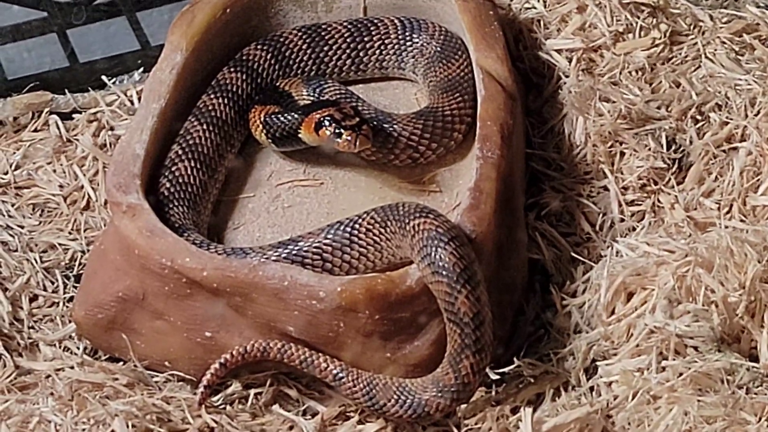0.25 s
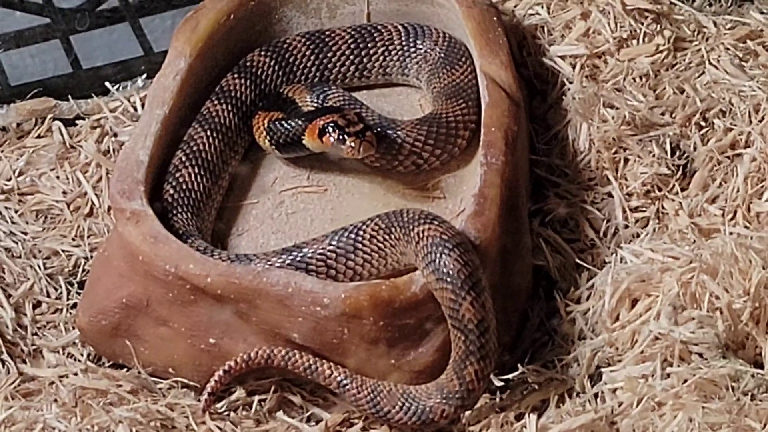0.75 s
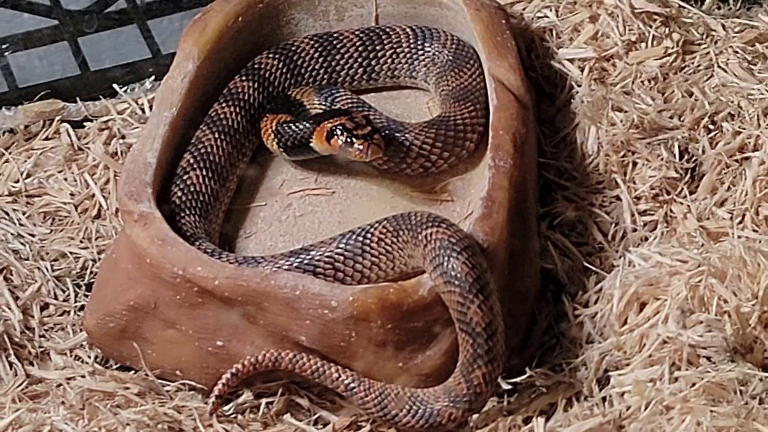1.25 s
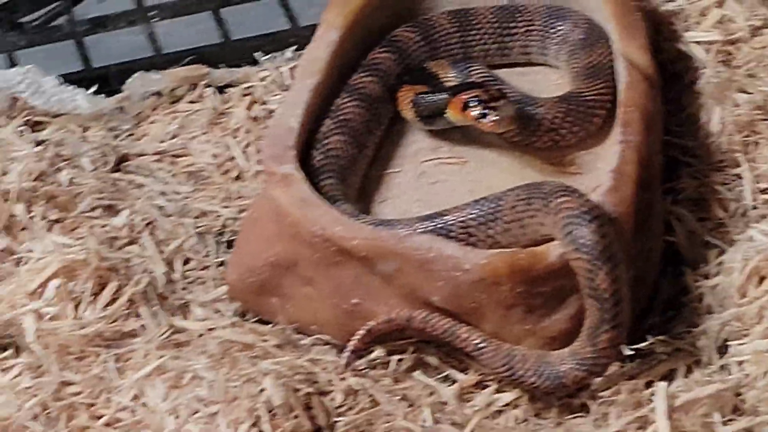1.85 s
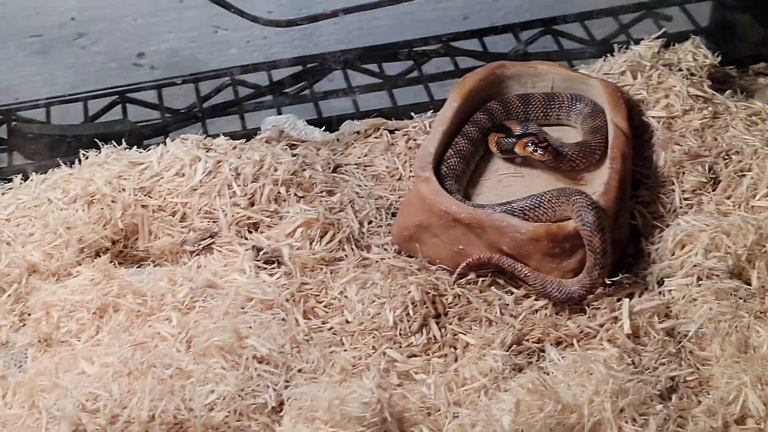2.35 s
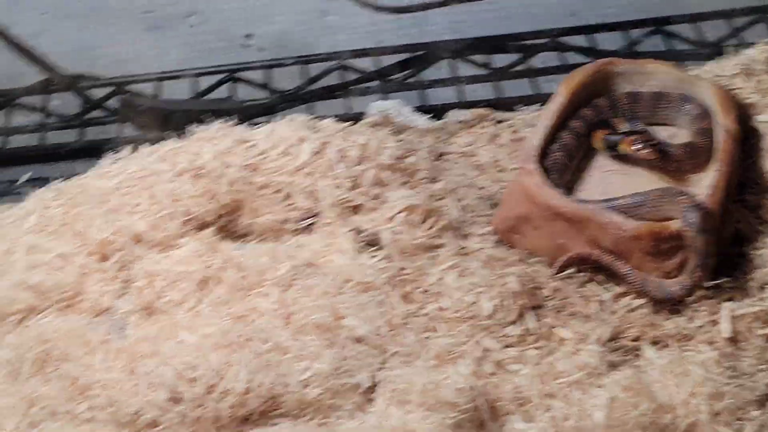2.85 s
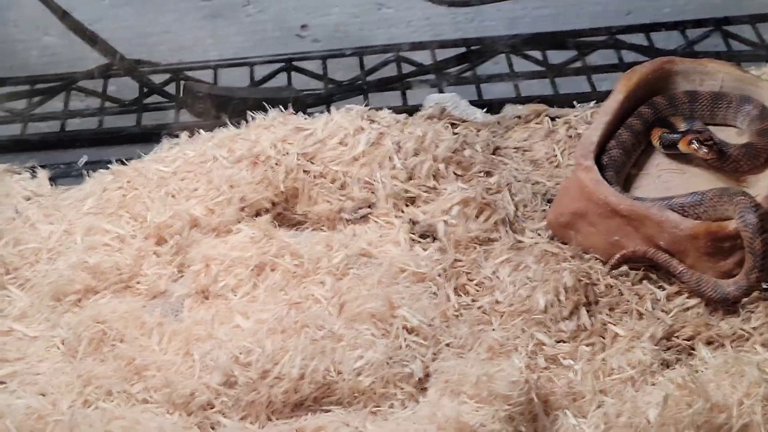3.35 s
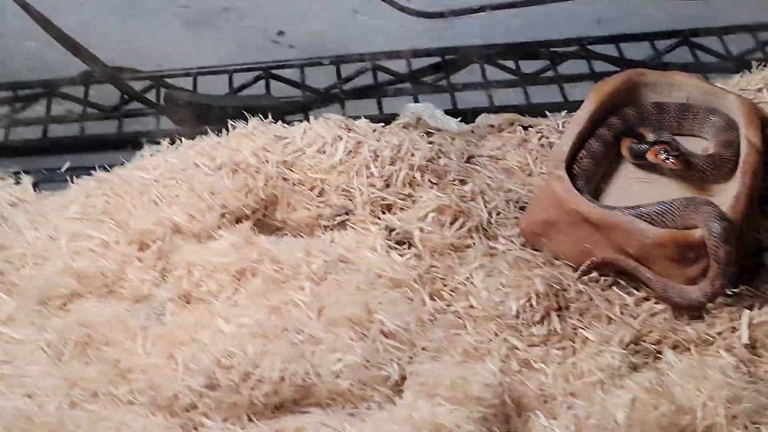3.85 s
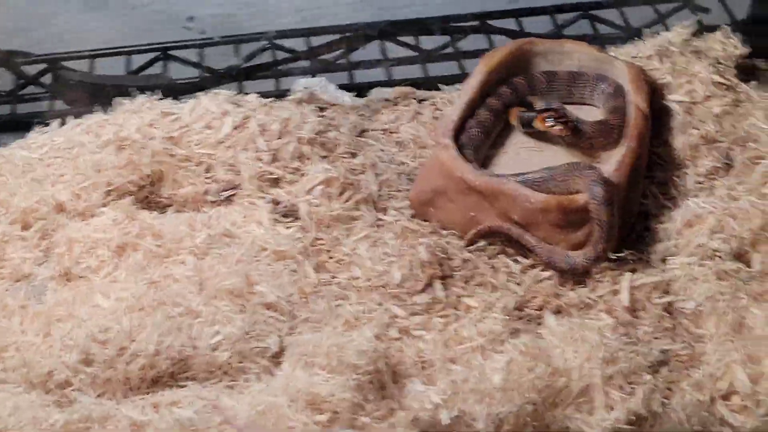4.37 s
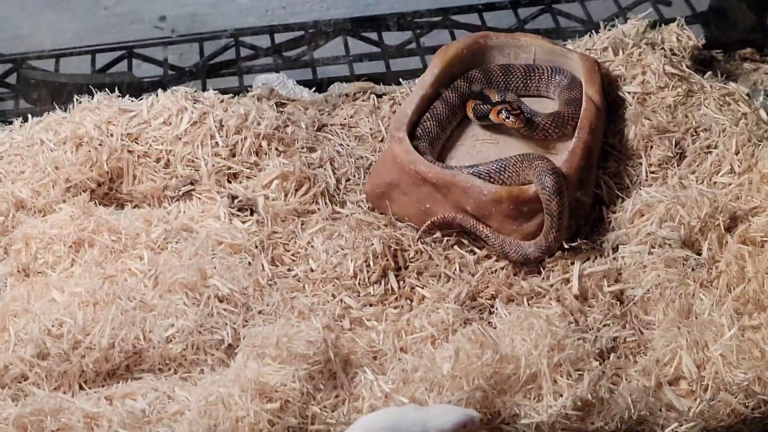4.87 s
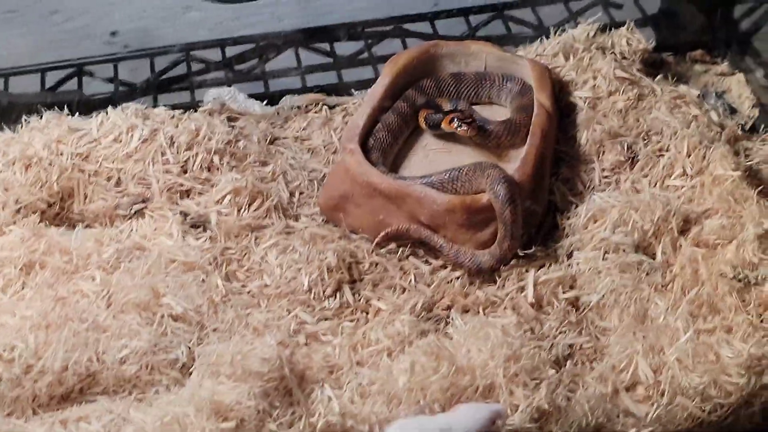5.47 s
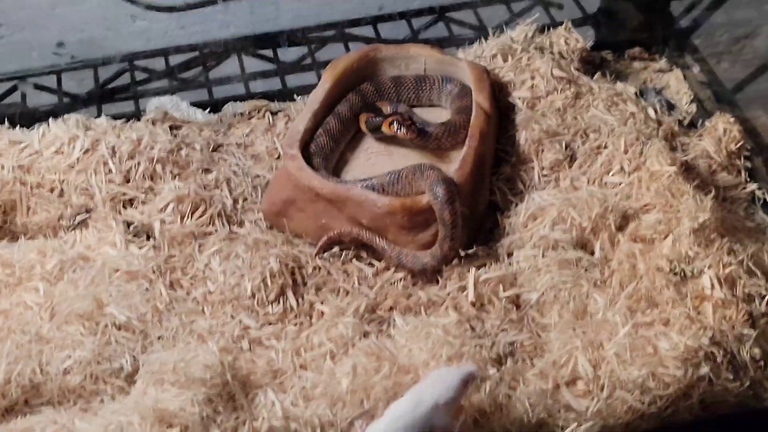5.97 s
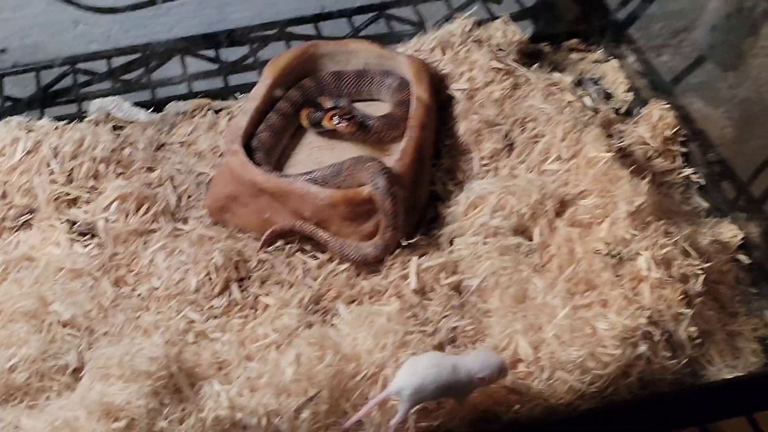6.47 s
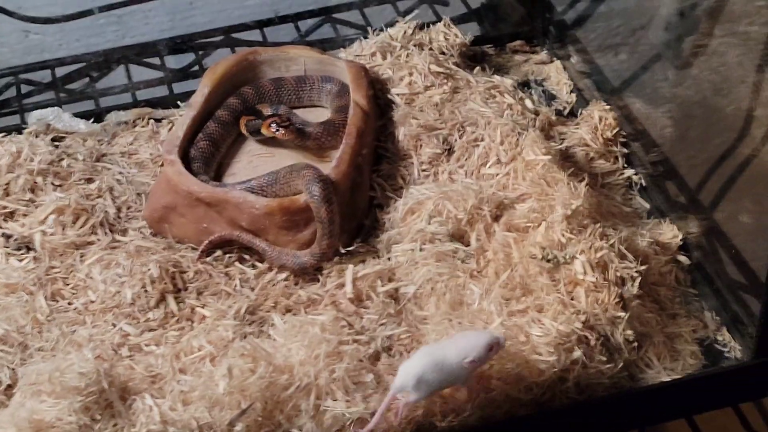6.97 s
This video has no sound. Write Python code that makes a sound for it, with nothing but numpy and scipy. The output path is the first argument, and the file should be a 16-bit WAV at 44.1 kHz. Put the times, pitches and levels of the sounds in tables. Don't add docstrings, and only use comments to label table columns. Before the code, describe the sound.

Continuous fast rattling of hollow tail segments, about twenty strokes a second, with occasional cage taps and handling bumps over faint, fading room rumble.

```python
import sys
import numpy as np
from scipy import signal
from scipy.fft import rfft, irfft, next_fast_len
from scipy.io import wavfile
from scipy.ndimage import uniform_filter1d

SR = 44100
rng = np.random.default_rng(int(sys.argv[2]) if len(sys.argv) > 2 else 0)


def file_out(sig):
    cols = np.atleast_2d(sig).T
    lim = np.clip(cols, -1, 1)
    pcm = np.round(lim * 32767).astype(np.int16)
    wavfile.write(sys.argv[1], SR, pcm)


def field_ratio(decibels):
    return 10 ** (np.asarray(decibels, dtype=float) / 20)


N = 318402
SIZE = next_fast_len(N + SR // 2)
BINS = np.arange(SIZE // 2 + 1) * SR / SIZE + 1

# (time [s], level [dB], swell [ms])
TAIL_SHAKING = [(.018, -35, 58), (.134, -34, 32.5), (.990, -33.5, 32), (1.867, -33, 28), (1.957, -34.5, 17),
                (2.069, -34, 24), (2.378, -36, 20), (2.516, -33.5, 15), (3.307, -34, 15.6),
                (4.078, -32.5, 18), (4.319, -34, 14), (4.920, -34.5, 27.5), (5.643, -35.5, 25),
                (5.682, -38, 20), (5.796, -34, 30), (6.860, -32.5, 18.5), (7, -32.5, 18),
                (7.165, -36.5, 43)]
STROKES_DONE = [0, 2, 19, 36, 38, 40, 46, 49, 65, 80, 85, 97, 111, 112, 114, 135, 138, 141]
# (time [s], level over the rest [dB])
ACCENTS = [(.19, 3), (.235, -3), (.38, -2.5), (.43, 2), (1.15, -2.5), (1.20, 1), (1.30, -2.5), (1.41, 1.5),
           (1.555, -4), (1.71, -1.5), (2.12, -4.5), (2.43, 3.5), (2.47, -2), (2.86, -1.5), (2.91, 2),
           (3.11, -5.5), (3.52, -3), (3.66, 0.5), (3.72, -2.5), (3.77, 1), (4.18, 2), (4.27, 3), (4.32, -3),
           (4.42, 3.5), (6.81, 2), (5.07, 2), (5.54, 2.5), (6.505, 1), (6.61, 1.5), (6.66, -2)]


def strokes():
    scatter_db, jitter_s, swell_scatter = 0.91, 0.0013, 0.11
    lead_s, snap_per_db = 0.010, 0.19
    number = np.arange(STROKES_DONE[-1] + 2)
    columns = np.transpose(TAIL_SHAKING)
    s, db, swell_ms = (np.interp(number, STROKES_DONE, column) for column in columns)
    s[-1] += s[-2] - s[-3]
    for at_s, over_db in ACCENTS:
        nearest = np.argmin(np.abs(s - at_s))
        db[nearest] += over_db
        swell_ms[nearest] *= np.exp(-snap_per_db * over_db)
    chance = rng.standard_normal((3, len(number)))
    swell_ms = swell_ms * np.exp(swell_scatter * chance[0])
    s = s - lead_s - 0.00023 * swell_ms + jitter_s * chance[1]
    return zip(np.maximum(s, 0), db + scatter_db * chance[2], swell_ms)


def effort():
    settle_s, loose_db = 0.012, -8
    t = np.arange(N) / SR
    power = np.zeros(N)
    for s, db, swell_ms in strokes():
        start = max(int((s - 0.05) * SR), 0)
        since = t[start:int((s + 0.15) * SR)] - s
        rise = 1 / (1 + np.exp(-since / (0.000066 * swell_ms)))
        fall = np.exp(-np.clip(since - 0.00059 * swell_ms, 0, None) / settle_s)
        power[start:start + len(since)] += field_ratio(2 * db) * rise * fall
    return np.sqrt(power + np.mean(power) * field_ratio(2 * loose_db))


def ticks():
    ticks_per_s, scatter_db = 1600, 2.5
    chance = rng.random((3, N))
    over = np.minimum(-np.log(1 - chance[1]), 3.5)
    size = field_ratio(scatter_db * over) * np.sign(chance[2] - 0.5)
    return unit((chance[0] < ticks_per_s / SR) * size)


def joints(force, count):
    shares = field_ratio(np.array([5.0 * walk(1.498) + 2.0 * walk(18) for _ in range(count)]))
    shares /= np.sqrt(np.sum(shares ** 2, axis=0))
    out = 0
    for share in shares:
        tint = np.transpose([1500 * 2 ** (np.arange(8) / 2), 0.77 * rng.standard_normal(8)])
        struck = rfft(ticks() * force * share, SIZE) * gain(tint)
        out = out + struck * room(0.17, near_t60_s=0.039, near_db=3)
    return out


# (frequency [Hz], level [dB per Hz])
SHELL_COLOUR = [(1000, -24), (1450, -26), (1900, -22), (2300, -13), (2700, -11), (3400, -12), (3900, -5),
                (4800, -1.5), (5700, -5), (6500, -6.5), (9000, -9.5), (12500, -5), (14000, -7.5),
                (15700, -7.5)]
# (frequency [Hz], width [Hz], level over the tick colour [dB])
SEGMENT_RINGS = [(2530, 97, -10), (4080, 240, -10.5), (4400, 190, -8.5), (4723, 220, -2.5),
                 (4813, 174, -0.5), (5606, 150, -4), (6960, 176, -5), (7960, 38, -9), (8440, 79, -7.5),
                 (10500, 56, -6.5), (12500, 100, -25.5)]
# (frequency [Hz], left minus right [dB])
EAR_BALANCE = [(1500, -1), (2400, 0.5), (4400, -3), (8000, 0), (13000, -2.5)]
# (time [s], left minus right [dB], sparkle [dB])
PHONE_TURN = [
    (0.0, 0, 0),
    (1.79, 0, -0.1),
    (2.13, -1, -0.7),
    (3.96, -0.5, -1.6),
    (4.38, -0.5, -1.1),
    (7.22, -0.5, -1.5),
]


def rattle():
    force = effort()
    rings = sum(field_ratio(db) * ring(hz, max(width_hz, 170)) for hz, width_hz, db in SEGMENT_RINGS)
    shell = gain(SHELL_COLOUR) * (1 + rings)
    side = np.array([[0.5], [-0.5]])
    heard = joints(force, count=3) * shell * gain(EAR_BALANCE) ** side
    treble = 1 / (1 + (6700 / BINS) ** 6)
    hump = irfft(heard * (1 - treble), SIZE)[:, :N]
    sparkle = irfft(heard * treble, SIZE)[:, :N]
    turn_db, aim_db = curve(PHONE_TURN, 1), curve(PHONE_TURN, 2)
    both = unit(hump + sparkle * field_ratio(aim_db - aim_db.mean()))
    both *= np.sqrt(np.mean(force ** 2)) * field_ratio(-0.18)
    return both * field_ratio(side * (turn_db - turn_db.mean()))


# (time [s], peak level [dB], frequency [Hz], left minus right [dB])
CAGE_TAPS = [(.190, -29, 628, 7), (.190, -35, 420, -5), (.191, -46, 1950, 0), (.224, -44, 545, -1),
             (.237, -49, 453, -1), (.443, -53, 630, -1), (1.191, -53, 620, -4), (1.220, -50, 443, -7),
             (1.236, -40.5, 642, 0), (2.010, -47.5, 394, -4), (2.012, -54, 804, -1), (2.360, -63, 556, -6),
             (2.768, -55.5, 629, -8), (2.908, -51.5, 746, 5), (3.714, -46, 456, -4), (3.713, -59, 940, -15),
             (3.931, -38.5, 2000, 1), (3.930, -41.5, 960, 5), (3.950, -39.5, 479, 3), (3.962, -42, 790, -8),
             (3.967, -47.5, 1910, -8), (4.467, -55, 427, -1), (5.341, -55, 425, 0)]
# (time [s], peak level [dB], frequency [Hz], left minus right [dB])
FLOOR_THUDS = [(.110, -40, 228, -3), (.199, -37, 150, -1), (.442, -54, 300, 3), (1.116, -49, 238, 0),
               (1.191, -52, 227, -2), (1.234, -38, 202, -4), (1.252, -37, 163, -1), (2.025, -42, 127, -4),
               (2.038, -49.5, 213, -1), (3.934, -42.5, 277, 11), (4.481, -49.5, 203, -1),
               (5.060, -55, 330, 4), (5.130, -55, 346, 2), (6.230, -56, 340, 5)]
# (time [s], peak level [dB], frequency [Hz], left minus right [dB])
CASE_CLICKS = [
    (3.5387, -23.5, 1780, 5),
    (3.5385, -28.5, 860, 6),
    (3.5397, -35.5, 1220, 2),
    (4.744, -49, 1140, -17),
]
# (time [s], peak level [dB], frequency [Hz], left minus right [dB])
HAND_BUMPS = [
    (.204, -25, 606, -11),
    (3.5384, -18, 557, 6),
    (4.107, -21.5, 320, 5),
    (4.108, -27.5, 108, 8),
    (4.122, -31, 40.2, 8),
    (6.0543, -35.5, 97, -6),
    (6.054, -42.5, 230, -9),
]


def knocks():
    parts = [(*row, 0.07, -7) for row in CAGE_TAPS]
    parts += [(*row, 0.09, -12) for row in FLOOR_THUDS]
    parts += [(*row, 0.019, -23) for row in CASE_CLICKS]
    parts += [(*row, 3.8 / row[2] + 0.0049, -21) for row in HAND_BUMPS]
    near, far = np.zeros((2, N)), np.zeros(N)
    t = np.arange(SR // 4) / SR
    for s, db, hz, pan_db, t60_s, room_db in parts:
        push = np.clip(t * hz, 0, 1)
        part = field_ratio(db) * np.sin(2 * np.pi * hz * t) * 1000. ** (-t / t60_s) * push
        at = slice(int(s * SR), int(s * SR) + len(t))
        near[:, at] += part * field_ratio(np.array([[pan_db], [-pan_db]]) / 2)
        far[at] += part * field_ratio(room_db)
    return near + irfft(rfft(far, SIZE) * room(0.27), SIZE)[:, :N]


# (time [s], length [s], level [dB], top frequency [Hz], left minus right [dB])
SCUFFS = [(.188, 0.11, -49.5, 776, -2), (0.443, 0.043, -57, 800, -3), (1.199, 0.13, -57, 750, -2),
          (1.227, .028, -55, 750, -8), (1.999, 0.061, -56, 520, -1), (2.361, .038, -59.5, 1000, -6),
          (3.538, .008, -36, 1690, -9), (3.71, .042, -55.5, 1400, -8), (3.926, .079, -50, 1100, -1),
          (4.462, 0.055, -60, 1310, 1), (5.05, 0.17, -67, 704, 9), (5.318, .24, -62, 620, -3),
          (6.23, 0.12, -62, 910, 4)]
# (time [s], length [s], level [dB], top frequency [Hz], left minus right [dB])
SCRAPES = [
    (0.182, .056, -50, 2170, -2),
    (1.22, 0.071, -55.5, 2040, -3),
    (3.937, .065, -59, 2220, 0),
]


def scuffs():
    rows = [(*row, 6.1) for row in SCUFFS] + [(*row, 1.65) for row in SCRAPES]
    out = np.zeros((2, N))
    for s, length_s, db, high_hz, pan_db, span in rows:
        mid, side, grain = rng.standard_normal((3, SR // 4))
        x = np.arange(SR // 4) / SR / length_s
        shape = np.clip(x / 0.096, 0, 1) * np.cos(np.clip(x, 0, 1) * np.pi / 2)
        shape *= field_ratio(2.4 * uniform_filter1d(grain, size=40))
        band = signal.butter(2, [high_hz / span, high_hz], "band", fs=SR, output="sos")
        pair = unit(signal.sosfilt(band, np.array([mid + 0.99 * side, mid - 0.27 * side])))
        pair = signal.sosfilt(band, pair * shape)
        start = int(s * SR)
        out[:, start:start + SR // 4] += pair * field_ratio(db + np.array([[pan_db], [-pan_db]]) / 2)
    return out


# (time [s], pitch [Hz], level [dB])
MOTOR_HUM = [
    (0, 63.84, -50.5),
    (.7, 64.3, -54),
    (2.38, 66.5, -56.5),
    (4.57, 66.6, -61),
    (5.4, 65.4, -63),
    (5.7, 63.4, -63.5),
    (5.95, 62.9, -74),
    (6.4, 61.2, -65),
    (7.2, 59.6, -75),
]


def hum():
    pitch_hz = curve(MOTOR_HUM, 1) + 0.52 * walk(6)
    turn = 2 * np.pi * np.cumsum(pitch_hz) / SR / 3
    waver_db = (1.0 + 0.43 * np.arange(N) / SR) * walk(7.22)
    tone = np.sin(3 * turn) * field_ratio(waver_db)
    for order, db in [(2, -15.5), (4, -17.5), (6, -19.0)]:
        tone += field_ratio(db) * np.sin(order * turn)
    tone *= np.sqrt(2) * field_ratio(curve(MOTOR_HUM, 2))
    return np.array([tone, np.roll(tone, 40)])


# (frequency [Hz], level [dB per Hz])
AIR_COLOUR = [(13, -31), (22, 5), (59, 12.5), (81, 7), (178, -7.5), (404, -14), (524, -7.5), (644, -12),
              (734, 0.5), (1110, -36), (1410, -24), (1900, -13), (2470, -33), (4180, -120)]
# (time [s], level [dB])
AIR_LEVEL = [
    (0, -55.5),
    (.7, -56.5),
    (2.0, -59.5),
    (2.6, -61),
    (3.9, -59),
    (4.85, -64.5),
    (5.3, -60.5),
    (5.8, -64.5),
    (7.22, -66),
]


def air():
    mid, side = colour(rng.standard_normal((2, N)), AIR_COLOUR)
    side = colour(side, [(40, -4.0), (250, -67), (1000, 10), (2200, 7.0)])
    pair = np.array([mid + side, mid - side])
    level_db = curve(AIR_LEVEL, 1)
    rumble = unit(colour(pair, [(130, 0), (190, -50)])) * field_ratio(level_db - 3.0 + 0.59 * walk(2.9))
    whoosh = unit(colour(pair, [(120, -57), (170, 14)])) * field_ratio(level_db - 10.0 + 0.4 * walk(12))
    return rumble + whoosh


# (frequency [Hz], level [dB])
WALL_TINT = [(1500, 1), (3000, 4.5), (4800, -2), (9000, -1), (15000, -6.5)]


def room(t60_s, near_t60_s=0.03, near_db=-40):
    gap_s = 0.003
    t = np.arange(SR // 2) / SR
    noise = rng.standard_normal((2, 2, SR // 2))
    slow = noise[0] * 1000. ** (-t / t60_s) * (t > gap_s) / np.sqrt(t60_s * SR / 14)
    quick = noise[1] * 1000. ** (-t / near_t60_s) / np.sqrt(near_t60_s * SR / 14)
    return rfft(slow, SIZE) * gain(WALL_TINT) + field_ratio(near_db) * rfft(quick, SIZE)


def ring(hz, width_hz):
    return 1 / (1 + 2j * (BINS - hz) / width_hz)


def gain(points):
    hz, db = np.transpose(points)
    return field_ratio(np.interp(np.log(BINS), np.log(hz), db))


def colour(x, points):
    return irfft(rfft(x, SIZE) * gain(points), SIZE)[..., :N]


def curve(table, column):
    rows = np.array(table, float)
    return np.interp(np.arange(N) / SR, rows[:, 0], rows[:, column])


def unit(x):
    return x / np.sqrt(np.mean(x ** 2))


def walk(rate):
    k = int(SR / rate)
    steps = np.repeat(rng.standard_normal(N // k + 1), k)
    return unit(uniform_filter1d(uniform_filter1d(steps, k), k)[:N])


def scene():
    return rattle() + knocks() + scuffs() + hum() + air()


def band_limit(x):
    return signal.sosfilt(signal.butter(12, 15890, fs=SR, output="sos"), x)


def record(dry):
    steep = signal.ellip(10, 0.3, 55, 15770, fs=SR, output="sos")
    mix = signal.sosfilt(steep, dry)
    return band_limit(mix)


dry = scene()
out = record(dry)
file_out(out)
```